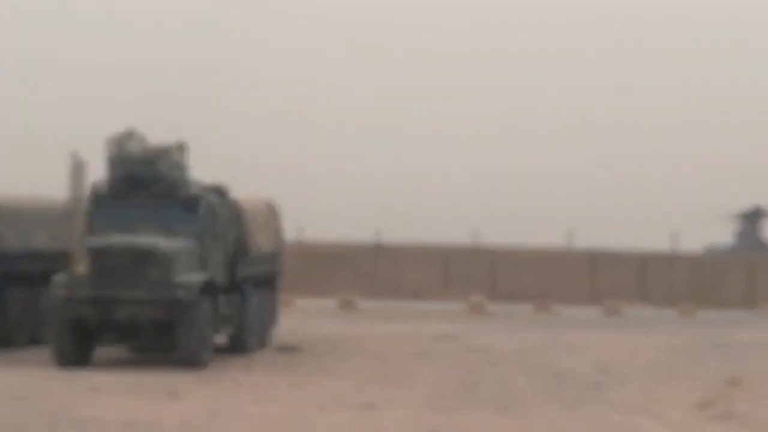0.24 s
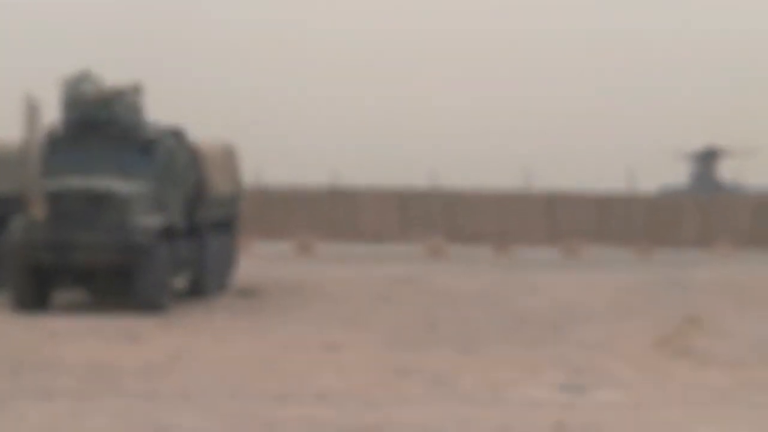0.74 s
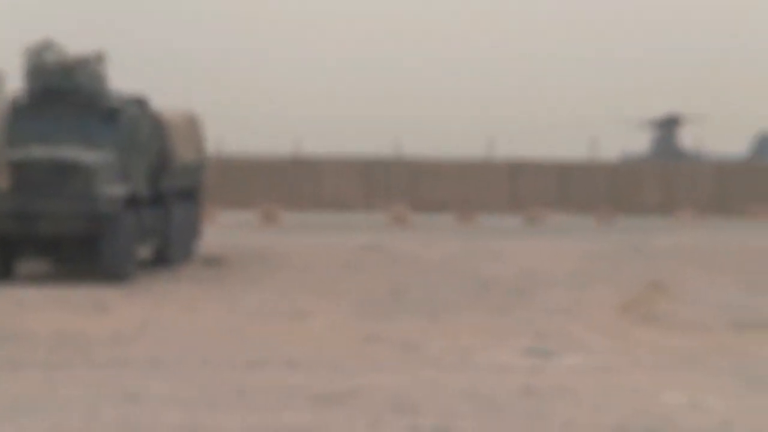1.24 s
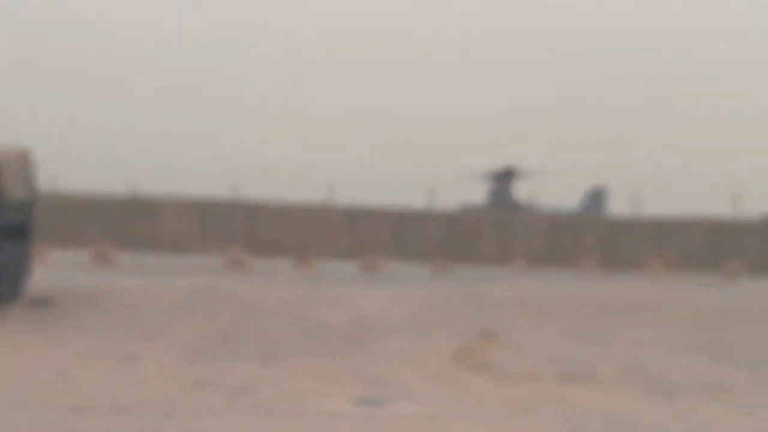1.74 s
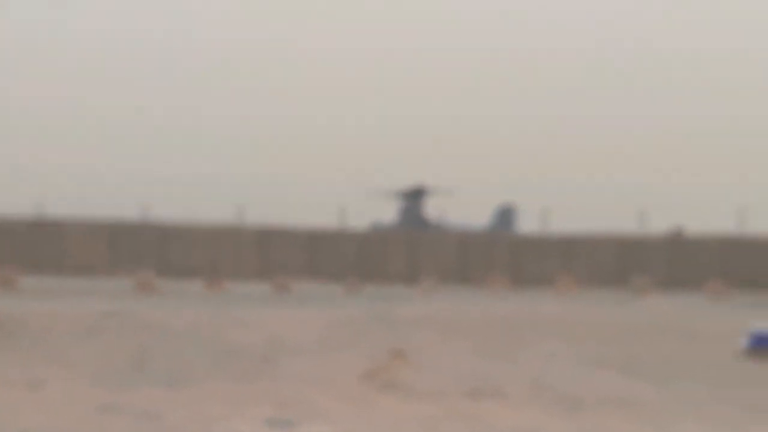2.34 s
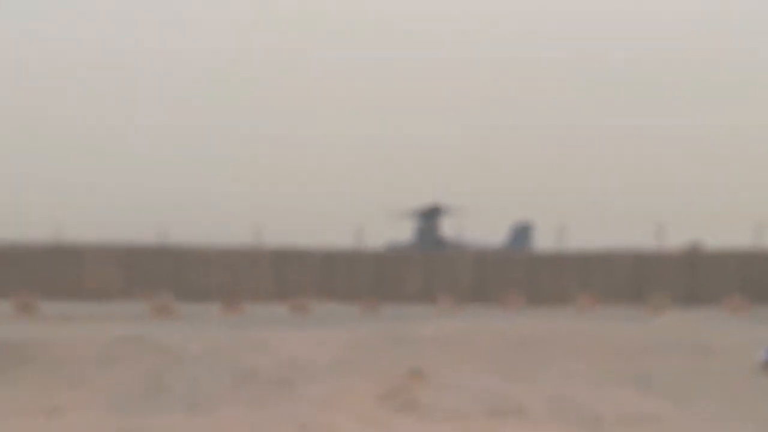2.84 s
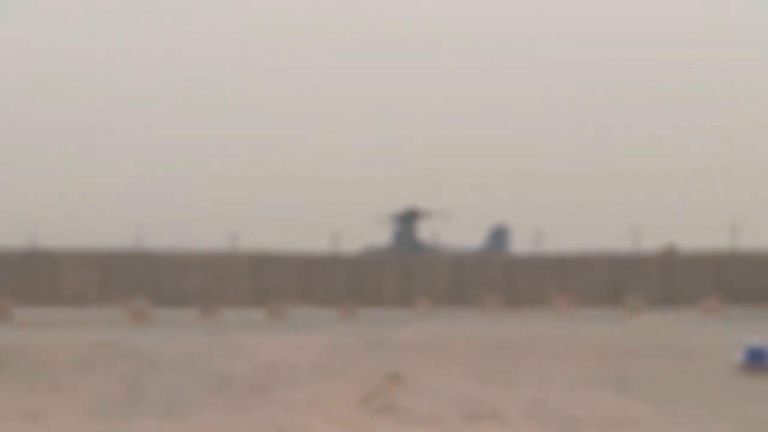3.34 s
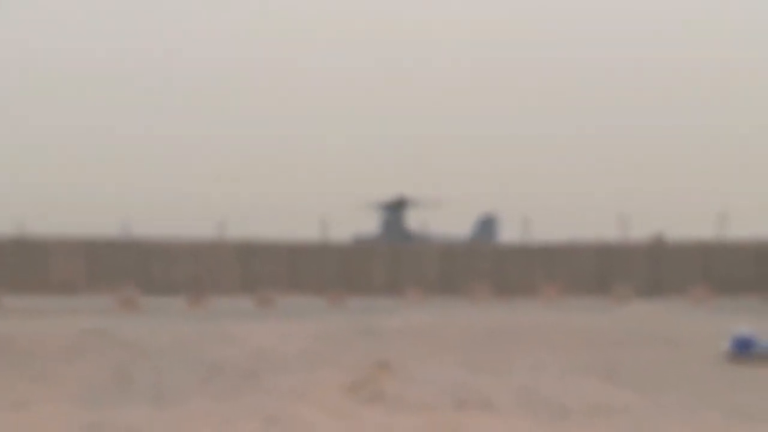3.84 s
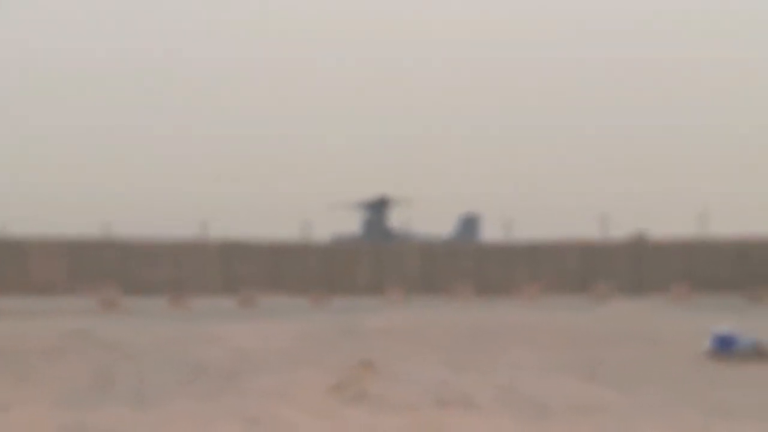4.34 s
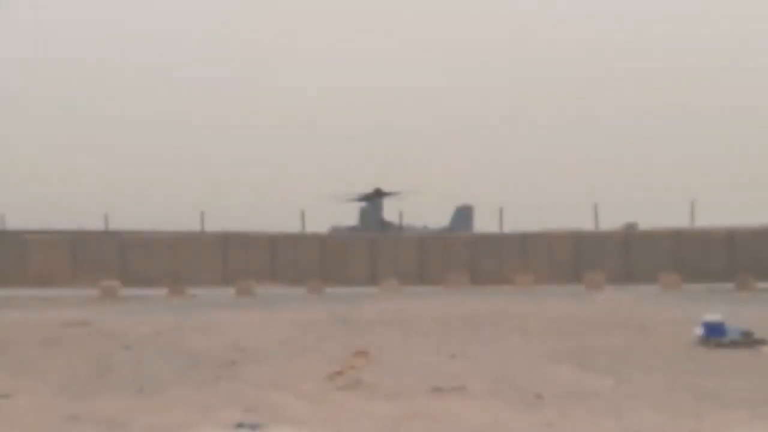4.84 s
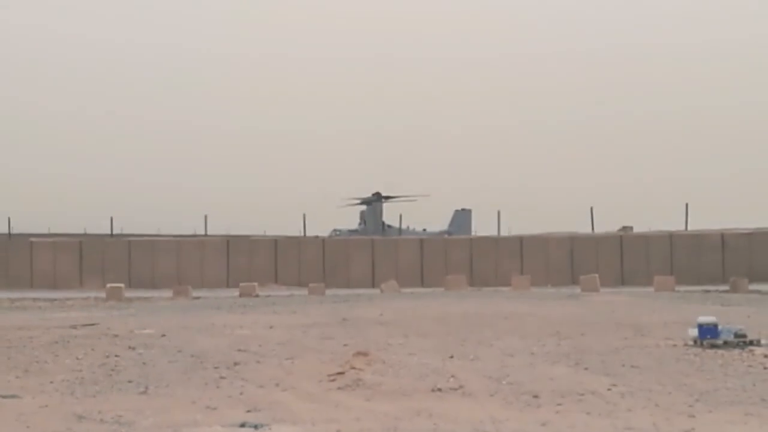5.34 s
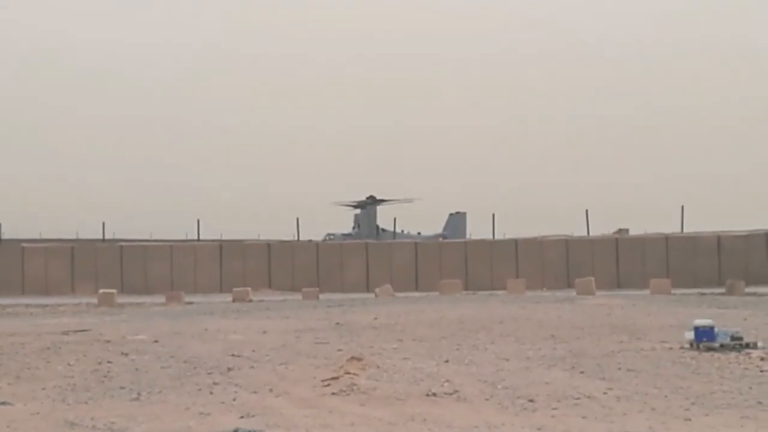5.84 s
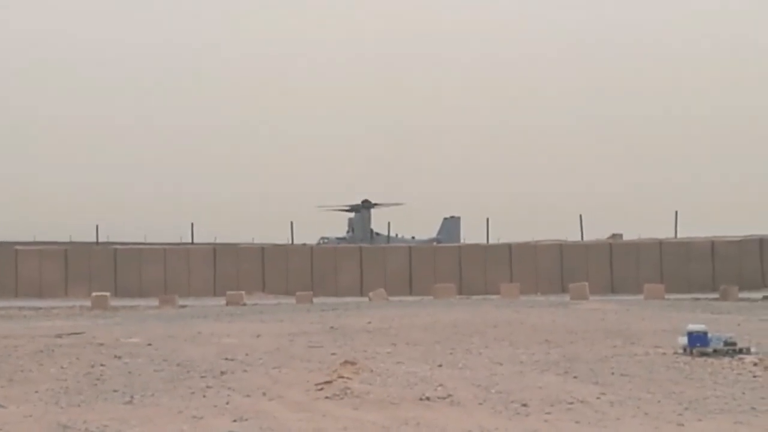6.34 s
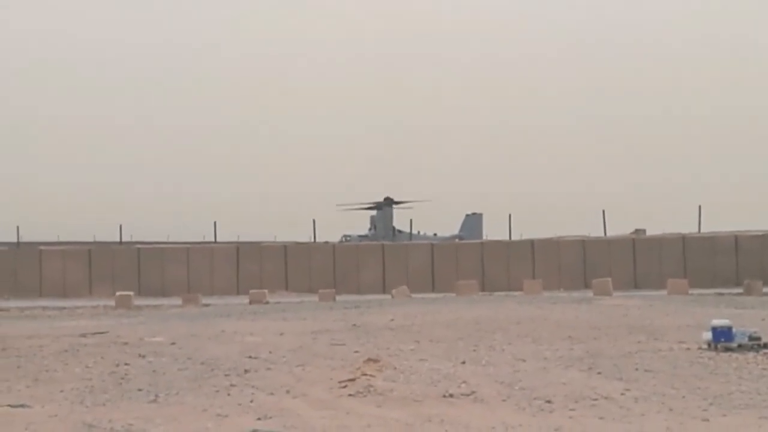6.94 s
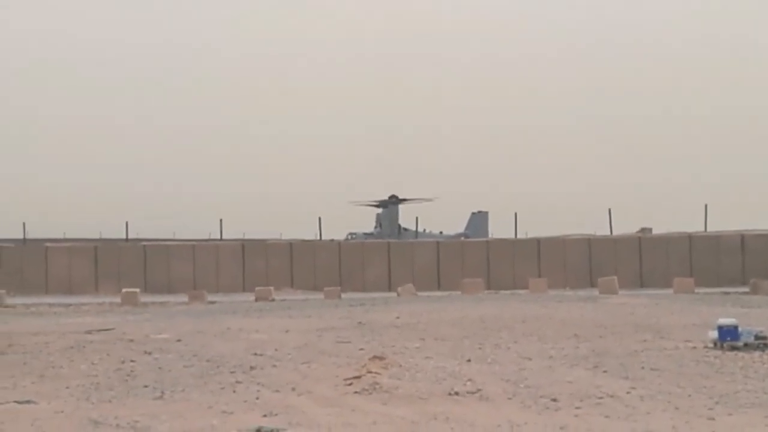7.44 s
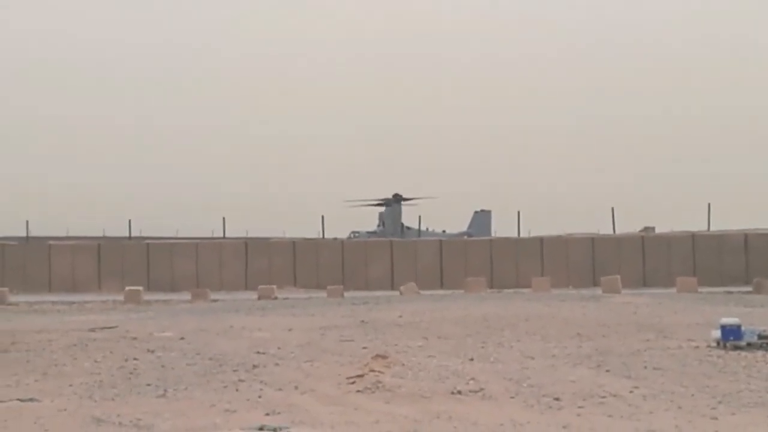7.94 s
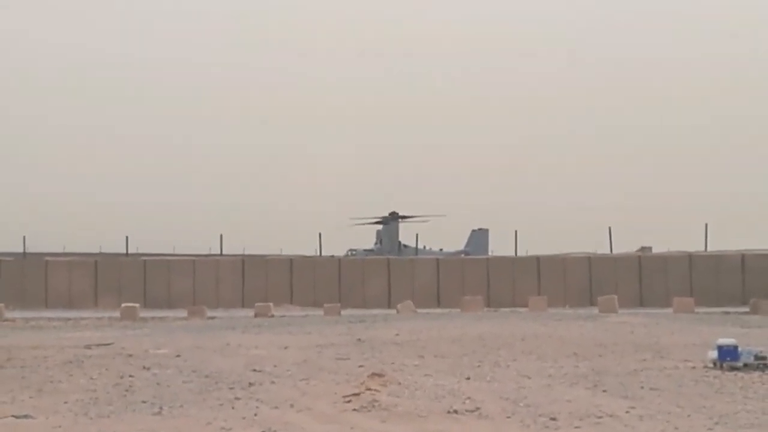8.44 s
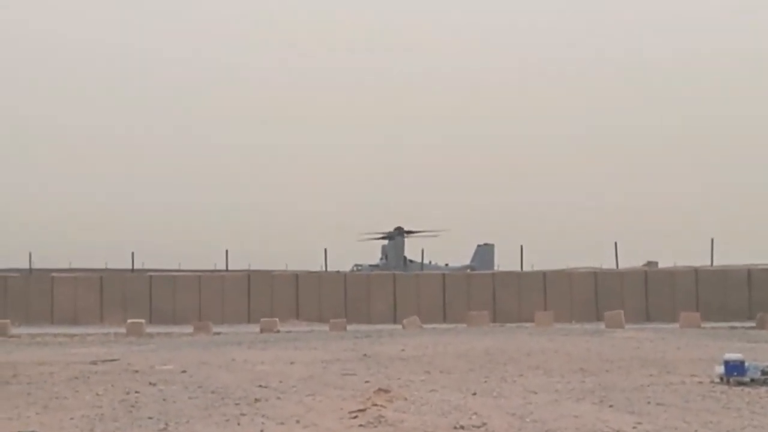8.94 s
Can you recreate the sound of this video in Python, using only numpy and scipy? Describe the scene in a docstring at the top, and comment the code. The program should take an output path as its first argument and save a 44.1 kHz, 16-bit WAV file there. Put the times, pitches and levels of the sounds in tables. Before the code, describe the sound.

Heard in stereo across an open outdoor space, the rotors of an idling tiltrotor aircraft keep up a fast, even thudding. Gusty rumble, broad turbine roar and drifting gear whines run underneath, along with the faint rattle of a diesel truck in front. Brief, thin squeaks appear nearby on the left after a few seconds; later the truck picks up a little and a hiss joins in.

```python
"""A tiltrotor idles behind a wall on a dusty open base, heard at two microphone ports.
From the start its two geared rotors thump in pairs and slap the air over downwash rumble, turbine roar
and gear whines, while a diesel truck clatters faintly ahead. From about 3 s thin squeaks come and go,
most of them close on the left. The truck gradually speeds up a little, and near 8 s a separate hiss,
probably from the truck, swells in."""
import sys
import numpy as np
from scipy import signal
from scipy.fft import rfft, irfft, next_fast_len
from scipy.io import wavfile
from scipy.ndimage import uniform_filter1d

SR = 44100
rng = np.random.default_rng(int(sys.argv[2]) if len(sys.argv) > 2 else 0)


def bounce(signal):
    """Save signal as a 16-bit WAV file at the path given by the first command-line argument."""
    frames = np.transpose(np.atleast_2d(signal))
    limited = np.clip(frames, -1, 1)
    pcm = np.round(limited * 32767).astype(np.int16)
    wavfile.write(sys.argv[1], SR, pcm)


N = 405279
BLADES_PER_S = 20.4786  # blade passes of each rotor


def gain_of(db):
    """Decibels to gain."""
    return 10 ** (np.asarray(db) / 20)


def unit_rms(x):
    """Scales to rms 1."""
    return x / np.sqrt(np.mean(x ** 2) + 1e-20)


def spectrum_at(points, hz, column=1):
    """One column of a spectrum table, read on a log-frequency axis."""
    table = np.transpose(points)
    return np.interp(np.log(hz + 1), np.log(table[0] + 1), table[column])


def clicks(times, sizes):
    """Impulses of the given sizes at the given times in seconds."""
    at = np.round(times * SR).astype(int)
    inside = (at >= 0) & (at < N)
    return np.bincount(at[inside], sizes[inside], N)


def placed(x, pan_db, lag_ms):
    """Pans a sound: the left port louder by pan_db, the right one later by lag_ms."""
    delayed = np.roll(x, round(lag_ms * SR / 1000))
    return np.array([x * gain_of(pan_db / 2), delayed * gain_of(-pan_db / 2)])


def wavering(count, smooth_ms):
    """Smooth random modulation of rms 1."""
    span = max(round(smooth_ms * SR / 1000), 1)
    return unit_rms(uniform_filter1d(uniform_filter1d(rng.standard_normal(count), span), span))


def lingering(shape, keep):
    """Random values that keep a share of the pass before, as the wake persists; passes come out last."""
    return signal.lfilter([np.sqrt(1 - keep ** 2)], [1, -keep], rng.standard_normal(shape), axis=0).T


def air_noise(size, level_db, patchy_db, path_ms=0.59):
    """Noise shaped by level_db(hz, t), with drifting patches, partly alike and later on the right."""
    # likeness of the ports: (frequency [Hz], coherence [0-1], right lead apart from the path [rad])
    ports = [(60, 1, 0.38), (150, 1, 0.99), (272, 0.93, 0.78), (348, 0.65, 1), (490, 0.91, -1.65),
             (827, 0.69, 2), (984, 0.42, 0.95), (1500, 0.34, -2.2), (2110, 0.37, 0.53), (3000, 0.21, -0.87),
             (4000, 0.15, 2), (4730, 0.65, -1.5), (6100, 0.19, 0.15), (9000, 0.23, 1.3)]
    frames, hz = 4 * N // size + 5, np.fft.rfftfreq(size, 1 / SR)
    t = np.arange(frames) * size / 4 / SR
    left_re, left_im, own_re, own_im, patches = rng.standard_normal((frames, len(hz), 5)).T
    patches = unit_rms(uniform_filter1d(uniform_filter1d(patches, 9, 0), 12, 1))
    coherence = np.clip(spectrum_at(ports, hz), 0, 1)[:, None]
    phase = spectrum_at(ports, hz, column=2) - 2 * np.pi * hz * path_ms / 1000
    left, own = left_re + 1j * left_im, own_re + 1j * own_im
    right = coherence * np.exp(1j * phase)[:, None] * left + np.sqrt(1 - coherence ** 2) * own
    gain = gain_of(level_db(hz, t) + patchy_db * patches) * np.sqrt(SR / size)
    return signal.istft(np.array([left, right]) * gain, nperseg=size, noverlap=3 * size // 4)[1][:, :N]


def gust_db(t, column):
    """Gusts ride a layer's level above and below its median."""
    # gusts: (time [s], rumble level [dB], roar level [dB])
    gusts = [(0.0, -27.5, -31.5), (0.6, -25.5, -31.5), (1.3, -27, -32.5), (3.5, -27, -32),
             (3.9, -25.5, -33.5), (6.0, -25.5, -33), (6.55, -28.5, -33), (6.7, -22, -32), (7.0, -28, -32),
             (7.4, -23, -31.5), (8.2, -25, -32.5), (9.19, -23, -29.5)]
    table = np.transpose(gusts)
    return np.interp(t, table[0], table[column] - np.median(table[column]))


def downwash(keep=0.38, throb_db=1.45):
    """Lumpy low rumble; each blade meets much the same eddies, so it partly repeats every pass."""
    # rumble spectrum: (frequency [Hz], level [dB])
    colour = [(25, -51), (50, -63), (75, -54), (110, -47.5), (250, -50), (440, -66.5), (700, -112.5)]
    rumble = air_noise(2048, lambda hz, t: spectrum_at(colour, hz)[:, None] + gust_db(t, column=1),
                       patchy_db=-0.5)
    size = next_fast_len(N + SR)
    one_pass_delay = np.exp(-2j * np.pi * np.fft.rfftfreq(size, 1 / SR) / BLADES_PER_S)
    comb = np.sqrt(1 - keep ** 2) / (1 - keep * one_pass_delay)
    throb = np.cos(2 * np.pi * (np.arange(N) / SR * BLADES_PER_S - .45))  # swells with each thump pair
    return irfft(rfft(rumble, size) * comb, size)[:, :N] * gain_of(throb_db * throb)


def roar_and_hiss(hiss_start_s=7.8, hiss_rise_s=0.069, hiss_lift_db=(4.1, 13), breath_db=0.2):
    """Broad turbine roar, plus a separate late hiss near 8 kHz, probably from the truck."""
    # turbine and blade roar: (frequency [Hz], left level [dB], right level [dB])
    colour = [(395, -70.5, -63.5), (598, -59, -72.5), (839, -57.5, -53), (885, -64.5, -66.5),
              (1347, -57.5, -56.5), (1650, -65.5, -63), (2060, -62, -57.5), (2540, -69.5, -61.5),
              (3580, -64.5, -65.5), (4340, -67, -68), (4700, -68.5, -68.5), (5850, -70.5, -70),
              (6760, -78, -82.5), (8440, -85, -83), (10860, -99, -99), (15200, -120, -120)]

    def level_db(hz, t):
        body_db = np.array([spectrum_at(colour, hz, column) for column in (1, 2)])[:, :, None]
        hz = hz[:, None]
        low_cut_db = -12 * np.log2(np.maximum(colour[0][0] / (hz + 1), 1))
        hiss_band = (np.exp(-((hz - 8050) / 250) ** 2) + np.exp(-((hz - 7900) / 1100) ** 2)) / 2
        lift_db = np.interp(t, [hiss_start_s, hiss_start_s + hiss_rise_s], hiss_lift_db)
        return body_db + low_cut_db + gust_db(t, column=2) + hiss_band * lift_db
    breath = np.cos(2 * np.pi * (np.arange(N) / SR * BLADES_PER_S - .02))  # once a blade pass
    return air_noise(512, level_db, patchy_db=1.21) * gain_of(breath_db * breath)


def diesel_truck(sharpness=1.8, weak_puff=0.42, uneven_db=2.5, grit_db=2.0, alike=0.63):
    """Gritty clatter ahead: a strong and a weak puff each engine cycle, every panel rattling unevenly."""
    # the engine idles, then speeds up a little: (time [s], cycles run [count])
    cycles = [(0, .55), (.998, 16.04), (2.195, 34.64), (3.392, 52.93), (4.29, 67.05), (5.188, 80.93),
              (6.086, 95.55), (6.984, 109.98), (7.283, 114.86), (7.882, 124.89), (8.78, 140.6),
              (9.19, 147.75)]
    # clatter envelope: (time [s], level [dB])
    envelope = [(0, -8.5), (1.6, -5), (2.2, -3.5), (3, -6), (3.5, -4.5), (4.5, -2), (5.1, -3.5),
                (5.6, -7.5), (6.8, -4.5), (7.3, -2), (8.3, -0.5), (9.19, -1)]
    # clatter spectrum: (frequency [Hz], level [dB])
    colour = [(900, -77), (1500, -63.5), (2400, -71.5), (3300, -68), (4200, -72.5), (5800, -78),
              (7000, -86), (8500, -86), (10500, -104), (13000, -130)]
    # bands that rattle separately: (low edge [Hz], high edge [Hz])
    panels = [(0, 2500), (2500, 3600), (3600, 5000), (5000, 20000)]
    t, size = np.arange(N) / SR, next_fast_len(N)
    hz = np.fft.rfftfreq(size, 1 / SR)
    cycle = np.interp(t, *np.transpose(cycles)) + 0.036
    swing = np.cos(2 * np.pi * cycle)
    puffs = np.exp(sharpness * (swing - 1)) + weak_puff * np.exp(sharpness * (-swing - 1))
    puffs = unit_rms(puffs) * gain_of(np.interp(t, *np.transpose(envelope)))
    spectrum = 0
    for low, high in panels:
        blows = np.tanh(rng.standard_normal(300))[np.round(cycle).astype(int)]  # one strength a cycle
        grit = np.tanh(wavering(N, smooth_ms=2))
        rattle = gain_of(uneven_db * uniform_filter1d(blows, size=400) + grit_db * grit)
        common, *own = rng.standard_normal((3, N))
        noise = alike * common + np.sqrt(1 - alike ** 2) * np.array(own)
        spectrum = spectrum + rfft(puffs * rattle * noise, size) * ((hz >= low) & (hz < high))
    return irfft(spectrum * gain_of(spectrum_at(colour, hz)) * np.sqrt(SR / 2), size)[:, :N]


def whines(whistle_db=-48, whistle_top_s=2.9):
    """Three slowly wavering gear tones, and a fuzzy turbine whistle that wavers fast and swells once."""
    # gears, then turbine: (pitch [Hz], waver [Hz], waver time [ms], left-right [dB], right lag [ms])
    tones = [(1103, 3, 50, 4, .25), (1970, 5, 50, -3, .5), (2205, 4, 50, -5, .55), (5680, 50, 12, 0, .53)]
    # the gears fade with the moving air: (time [s], low whine [dB], middle whine [dB], high whine [dB])
    fading = [(0.0, -36, -43, -53), (0.7, -48, -47, -62), (1.4, -55, -43, -39), (1.9, -41, -49, -42),
              (2.25, -37.5, -41, -41), (2.7, -37, -40, -31), (2.95, -42, -46, -52), (3.3, -57, -49, -52),
              (3.8, -34.5, -38, -41), (4.1, -50, -42, -40), (5.2, -47, -41, -58), (5.45, -36.5, -37.5, -39),
              (6.5, -39.5, -43, -44), (6.9, -45, -54, -40), (7.6, -41, -49, -54), (8.2, -40, -43.5, -57.5),
              (9.19, -43, -54, -52)]
    t, out = np.arange(N) / SR, np.zeros((2, N))
    times, *fades = np.transpose(fading)
    levels = [np.interp(t, times, db) for db in fades]
    swell_db = -6 * ((t - whistle_top_s) / 4) ** 2  # 6 dB down at 4 s from the top
    levels.append(whistle_db + swell_db + 4 * wavering(N, smooth_ms=70))
    for (hz, waver_hz, smooth_ms, pan_db, lag_ms), level_db in zip(tones, levels):
        pitch = hz + waver_hz * wavering(N, smooth_ms)
        tone = np.sqrt(2) * np.sin(2 * np.pi * np.cumsum(pitch) / SR)
        dips_db = -4.5 * abs(wavering(N, smooth_ms=32))  # stirred air breaks the tone up
        out += placed(gain_of(level_db + dips_db) * tone, pan_db, lag_ms)
    return out


def squeaks(attack_s=0.03, release_s=0.06, sag_db_per_s=-20, edge_db=-16):
    """Thin gliding tones that flutter and break up; the high ones sit left, the lowest one right."""
    # squeaks: (start [s], length [s], start pitch [Hz], middle pitch [Hz], end pitch [Hz], level [dB])
    glides = [(2.79, .1, 14150, 14150, 14300, -58), (2.87, .24, 14600, 14000, 13750, -64),
              (3.19, .08, 13500, 13250, 13100, -57), (4.63, .09, 13850, 14150, 14350, -65),
              (4.71, .14, 14150, 13820, 13780, -54), (5.82, .12, 14200, 14200, 14550, -63),
              (6.02, .11, 14100, 14270, 14270, -59), (6.12, .05, 13600, 13580, 13580, -70),
              (8.64, .22, 14230, 14190, 14260, -53), (5.57, .28, 15200, 15180, 15250, -70),
              (5.91, .28, 15400, 15380, 15200, -62), (8.785, .19, 15200, 15230, 15220, -60),
              (5.17, .27, 9050, 8900, 9350, -52), (2.89, .13, 10950, 11000, 10850, -65),
              (5.83, .1, 10900, 10950, 11000, -61)]
    out = np.zeros((2, N))
    for start, length, hz_start, hz_middle, hz_end, level_db in glides:
        at = round(start * SR) + np.arange(round(length * SR))
        t = at / SR - start
        pitch = np.interp(t, [0, length / 2, length], [hz_start, hz_middle, hz_end])
        pitch += 55 * wavering(len(at), smooth_ms=2.5)
        edge = np.maximum(np.maximum(1 - t / attack_s, 1 - (length - t) / release_s), 0)
        envelope_db = level_db + edge_db * edge + sag_db_per_s * np.maximum(t - attack_s, 0)
        flutter_db = 4.2 * wavering(len(at), smooth_ms=9.7)
        envelope = gain_of(envelope_db + flutter_db) * signal.windows.tukey(len(at), .15)
        tone = np.sqrt(2) * np.sin(2 * np.pi * np.cumsum(pitch) / SR)
        out[:, at] += placed(envelope * tone, pan_db=12 if hz_middle > 10000 else -4, lag_ms=0)
    return out


def blade_passes():
    """Start time of each blade pass, with the timing and levels of its beat as they drift in the wind."""
    # (time [s], near thump into the pass [ms], far thump into the pass [ms], then relative levels:
    # near thump [dB], far thump [dB], low slap [dB], early slaps [dB], middle slap [dB], crack [dB],
    # second crack [dB])
    beat = [(0.0, 16, 32.6, -7.5, -10, -19, -21.5, -36, -29, -17),
            (0.3, 16.4, 33.9, -9.5, -13.5, -30, -22.5, -21, -21, -15),
            (0.7, 16, 32.5, -13.5, -13.5, -16, -27, -19, -24, -39),
            (1.2, 14, 31.5, -13.5, -14, -20, -30, -34, -20, -26),
            (1.7, 15.2, 31, -11.5, -14, -22.5, -31, -26, -19.5, -19.5),
            (2.2, 15, 30.6, -14.5, -13, -21.5, -31, -36, -21.5, -23),
            (2.75, 12.6, 29.9, -10, -16, -21, -28, -30, -24, -24),
            (3.25, 13.7, 30, -11, -12.5, -22.5, -36, -39, -21, -32),
            (3.8, 13.1, 31, -10.5, -13.5, -22, -29.5, -27, -22.5, -28),
            (4.3, 15.4, 31.1, -10.5, -16, -20, -22.5, -30, -19.5, -24),
            (4.75, 13.5, 31.4, -14.5, -11.5, -22.5, -30.5, -27, -26, -46),
            (5.25, 17.3, 33.4, -10.5, -14, -17, -31, -29.5, -19, -38),
            (5.85, 14.35, 31, -11.5, -13.5, -18, -26, -25, -18, -33),
            (6.4, 13.6, 30.7, -9.5, -12.5, -19.5, -34, -21, -16, -34),
            (6.75, 13.5, 31.1, -8.5, -17, -26, -43, -27, -23, -38),
            (7.4, 15, 31.5, -13, -13.5, -23, -42, -18, -19, -39),
            (7.9, 14.6, 30.4, -19.5, -10.5, -22.5, -27, -27, -28.5, -33),
            (8.45, 13.1, 30.6, -8.5, -14, -23, -23.5, -35, -19, -21),
            (8.9, 14.8, 32.8, -9, -12.5, -20, -26.5, -39, -19.5, -33)]
    starts = np.arange(-1, N / SR * BLADES_PER_S + 1) / BLADES_PER_S
    times, *columns = np.transpose(beat)
    return starts, [np.interp(starts, times, column) for column in columns]


def blade_slaps(bursts=32, fade_db=1.9):
    """Blades cut the wake: each pass scatters short rounded bursts, patterned much like the last."""
    # rows: low slap, early low and early middle slaps, middle slap, crack, second crack, bright swish
    # (time in the pass [ms], nominal scatter [ms], centre [Hz], nominal width [Hz], relative level [dB],
    # left-right [dB], right lag [ms])
    slaps = [(27.165, 4.49, 755, 189, -4.5, 5, 0.26), (13.56, 3.005, 740, 180, -5, 6, 0.19),
             (12.54, 3.2, 1100, 600, 0, -2.5, 0.46), (28.8, 4.5, 1475, 320, -1.5, -6, 0.49),
             (40.5, 3.3, 2000, 400, -5, -9, 0.54), (4.585, 3.5, 2030, 650, -4, -8, 0.58),
             (5.97, 4, 3660, 1170, -4, -1.5, .59)]
    # cracks that snap harder than their neighbours: (time [s], accent [dB])
    hard_cracks = [(1.164, 3.5), (1.359, 6), (1.457, 5), (2.043, 4), (2.092, 1.5), (2.287, 1), (2.629, 3),
                   (3.264, 0.5), (3.459, 6.5), (3.801, 2), (4.924, 8), (4.973, 6.5), (5.217, 5),
                   (5.266, 4.5), (5.315, 3.5), (5.364, 5), (5.461, 7), (5.51, 4.5), (5.559, 2.5),
                   (6.34, 3.5), (6.487, 5.5), (6.682, 4), (7.17, 0), (7.219, 6), (8.587, 3), (9.026, -1)]
    starts, (*_, low_db, early_db, middle_db, crack_db, second_db) = blade_passes()
    passes, crack_times = len(starts), starts + slaps[4][0] / 1000
    snap_times, snap_db = np.transpose(hard_cracks)
    nearest_pass = abs(crack_times - snap_times[:, None]).argmin(1)
    accent_db = np.bincount(nearest_pass, snap_db, passes)
    tightening = gain_of(-.7 * accent_db)  # a hard snap also shortens the slaps of its pass
    levels = [low_db, early_db, early_db, middle_db, crack_db + accent_db, second_db, early_db]
    share = (np.arange(bursts)[:, None] + .5) / bursts
    spread = .6 * np.log(share / (1 - share)) * tightening  # bursts crowd round the middle of the slap
    out, t = np.zeros((2, N)), np.arange(-256, 257) / SR
    for (at_ms, scatter_ms, hz, width, trim_db, pan_db, lag_ms), level_db in zip(slaps, levels):
        offset_ms = scatter_ms * spread + 0.31 * lingering((passes, bursts), keep=.7)
        offset_ms += 1.298 * lingering(passes, keep=.8)  # the whole slap comes early or late
        when = starts + (at_ms + offset_ms) / 1000
        size = lingering((passes, bursts), keep=0.76)
        # every pass carries about the same energy, however it is shared out
        size *= gain_of(0.75 * lingering((passes, 1), keep=0.2)) / np.sqrt((size ** 2).mean(0))
        size *= 1.91 * gain_of(level_db + trim_db + fade_db * lingering(passes, keep=0.91))
        window = np.exp(-(.75 * np.pi * width * t) ** 2 / 2)
        for k, shift in enumerate(np.linspace(-.75, .75, 4)):  # four eddy sizes shift the colour
            burst = np.cos(2 * np.pi * (hz + shift * width) * t) * window
            train = clicks(when[k::4].ravel(), size[k::4].ravel())
            out += placed(signal.oaconvolve(train, burst / np.linalg.norm(burst), "same"), pan_db, lag_ms)
    return out


def thump_train(lobes, delay_ms, level_db, jitter_ms, uneven_db, echoes=()):
    """One low pressure pulse a blade, plus any echoes, slightly uneven in time and size."""
    starts, ms = blade_passes()[0], np.arange(-1000, 1001) * 1000 / SR
    pulse = sum(height * np.exp(-((ms - at) / width) ** 2) for at, width, height in lobes)
    train = np.zeros(N)
    for path_ms, path_db in [(0.018, 0), *echoes]:
        lateness, strength = lingering((len(starts), 2), keep=0.76)
        when = starts + (delay_ms + path_ms + jitter_ms * lateness) / 1000
        train += clicks(when, gain_of(level_db + path_db + uneven_db * strength))
    return signal.oaconvolve(train, pulse, "same")


def rotor_thumps():
    """The near rotor beats, then the far one with its echoes: suction first, then a pressure peak."""
    # lobes of a thump (suction, peak, tail): (time from the peak [ms], width [ms], height [relative])
    near_lobes = [(-4, 1.58, -0.77), (0, 2.28, 0.89), (3.5, 1.85, 0.17)]
    far_lobes = [(-4.5, 2.55, -0.75), (0, 2.33, 0.99), (12, 4.9, -0.065)]
    # wall echoes of the far thump: (delay [ms], level [dB])
    walls = [(11.8, -13), (23.2, -15.5)]
    # extra depth of the suction before the near thump: (time [s], level [dB])
    suction_depth = [(.25, 2), (.75, -1.5), (1.25, 2.5), (1.75, -1.5), (2.75, -1.5), (3.25, 2), (3.75, 4),
                     (4.75, 5), (5.25, -1), (5.75, -1.5), (7.25, 2), (7.75, -1), (8.75, 1)]
    starts, (near_ms, far_ms, near_db, far_db, *_) = blade_passes()
    suction_db = near_db + np.interp(starts, *np.transpose(suction_depth))
    suction = thump_train(near_lobes[:1], near_ms, suction_db, jitter_ms=0.12, uneven_db=0.8)
    near = thump_train(near_lobes[1:], near_ms, near_db, jitter_ms=0.12, uneven_db=0.7)
    far = thump_train(far_lobes, far_ms, far_db, jitter_ms=0.25, uneven_db=0.7, echoes=walls)
    return placed(suction + near + far, pan_db=-.1, lag_ms=0.34)


def scene():
    """Aircraft far off, truck ahead, squeaks close by."""
    rotors = rotor_thumps() + blade_slaps() + downwash()
    return rotors + roar_and_hiss() + whines() + diesel_truck() + squeaks()


def record(dry, low_cut_hz=24, high_cut_hz=15600):
    """The microphone drops the deepest bass; a steep filter trims the very top."""
    trimmed = signal.sosfilt(signal.butter(2, low_cut_hz, "high", fs=SR, output="sos"), dry)
    lowpass = signal.firwin(511, high_cut_hz, window=("kaiser", 9), fs=SR)
    return signal.oaconvolve(trimmed, lowpass[None], "same")


dry = scene()
out = record(dry)
bounce(out)
```